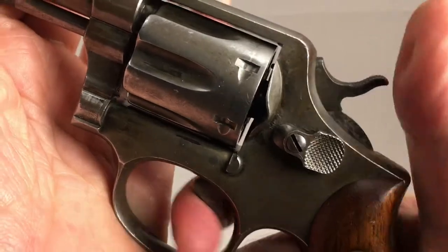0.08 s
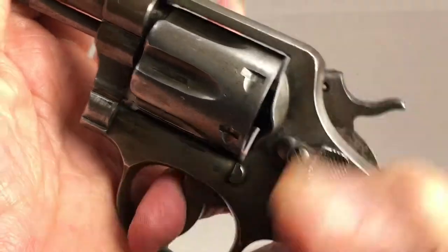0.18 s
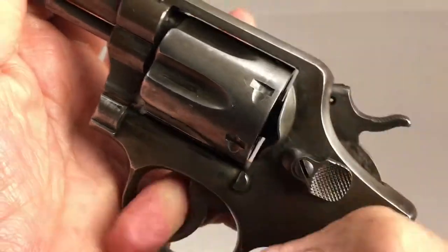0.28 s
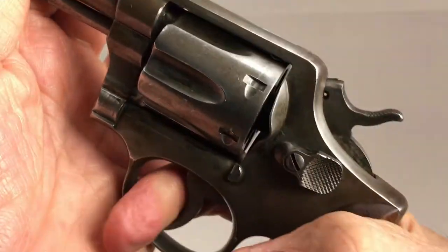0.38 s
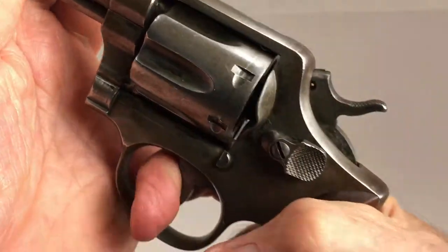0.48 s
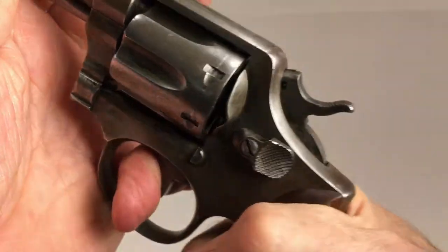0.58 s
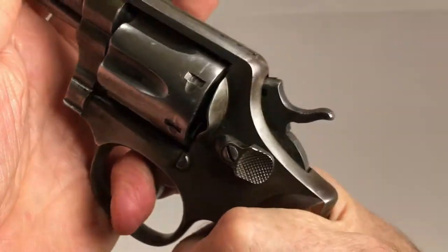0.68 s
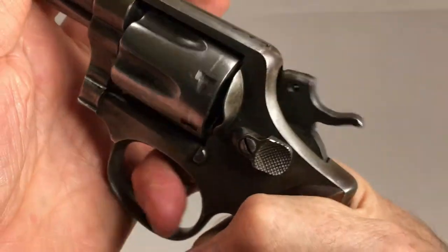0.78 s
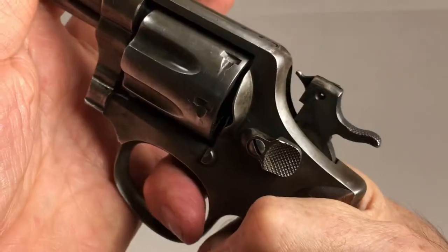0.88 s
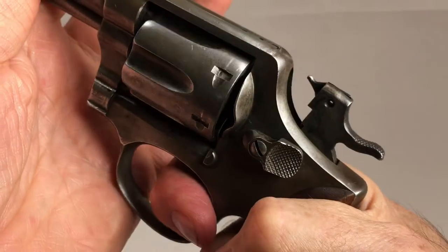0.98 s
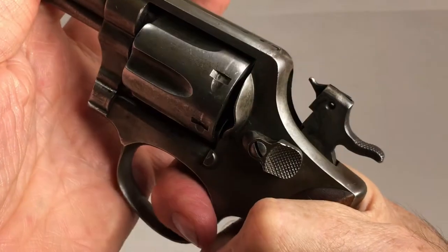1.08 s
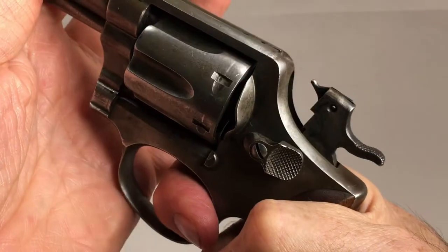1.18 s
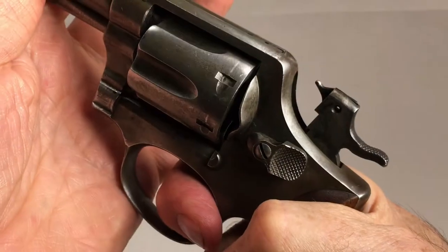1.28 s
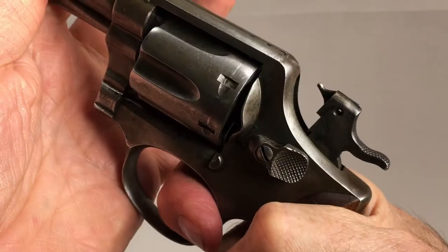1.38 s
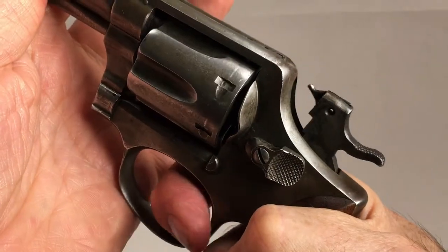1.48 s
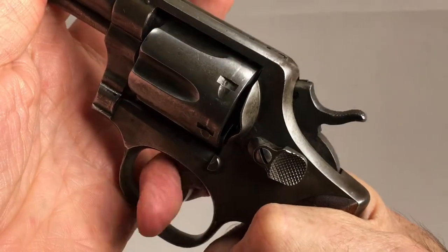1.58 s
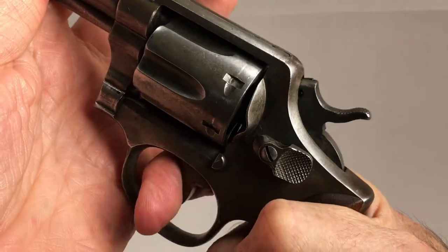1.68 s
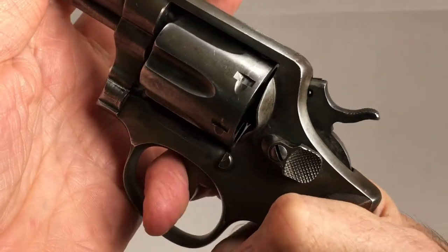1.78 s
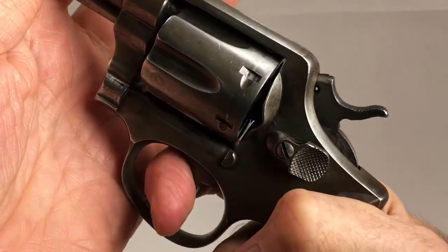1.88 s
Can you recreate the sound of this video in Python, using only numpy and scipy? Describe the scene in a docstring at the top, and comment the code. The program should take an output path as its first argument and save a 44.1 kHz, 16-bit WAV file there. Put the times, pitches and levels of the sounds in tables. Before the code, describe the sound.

Revolver action clicks sharply as the trigger springs forward, the cylinder locks and the hammer falls

```python
"""Low rumble and fine hiss fill a small quiet room, then a revolver is worked by hand close to the microphone.
The trigger springs forward, a slow pull turns and locks the cylinder with two dry knocks, and the hammer falls.
Each click is a few steel contacts within milliseconds: broadband pulses, dense clatter and dying modes.
Small ticks lead up to the clicks; noise bands are the soft rubs, falling sines the jolts of the frame.
A response of early scatter, one wall echo and a short tail gives the room."""
import sys
import numpy as np
from scipy import signal
from scipy.fft import rfft, irfft
from scipy.io import wavfile

SR = 44100
rng = np.random.default_rng(int(sys.argv[2]) if len(sys.argv) > 2 else 0)


def unload_wav(signal):
    """Save mono or channel-first audio to the path in sys.argv[1] as 16-bit WAV at rate SR, clipped to [-1, 1]."""
    wavfile.write(
        sys.argv[1],
        SR,
        np.round(np.clip(np.atleast_2d(signal).T, -1, 1) * 32767).astype(np.int16),
    )


N = 85995  # length in samples
ONE_MS_GAIN = np.sqrt(SR / 1000)  # gives a sound of energy 1 an rms of 1 over one millisecond


def amp(db):
    """Decibel definition: converts a level to an amplitude gain."""
    return 10 ** (np.asarray(db) / 20)


def unit(x):
    """Energy normalisation: scales the sum of squares to 1."""
    return x / np.sqrt(np.sum(x ** 2) + 1e-20)


def read(points, hz):
    """Logarithmic interpolation: reads a curve on a log-frequency axis."""
    point_hz, value = np.transpose(points)
    return np.interp(np.log(hz + 1), np.log(point_hz + 1), value)


def add(mix, start_s, sound):
    """Superposition: adds a sound into the mix, in place, from its start time."""
    part = mix[max(round(start_s * SR), 0):][:len(sound)]
    part += sound[:len(part)]


def seconds(size):
    """Sampling: the time axis of so many samples."""
    return np.arange(size) / SR


def noise(colour):
    """Spectral shaping: steady random noise of rms 1 with the given spectrum."""
    gain = amp(read(colour, np.fft.rfftfreq(N, 1 / SR)))
    shaped = irfft(rfft(rng.standard_normal(N)) * gain, N)
    return unit(shaped) * np.sqrt(N)


def snap(colour, tilt_db=0, size=2048):
    """Minimum phase: the causal pulse of a given spectrum with its energy as early as possible."""
    hz = abs(np.fft.fftfreq(size, 1 / SR))
    tilt = tilt_db * np.log2(1 + hz / 1000)
    log_gain = np.log(amp(read(colour, hz) + tilt))
    # the Hilbert transform of the log gain supplies the phase
    spectrum = np.exp(np.conj(signal.hilbert(log_gain)))
    return unit(np.fft.ifft(spectrum).real[:size // 2])


def clatter(pulse, snap_db, clatter_db, t60_s):
    """High modal density: a pulse, then the dense, quickly dying vibration of small steel parts."""
    t = seconds(size=16384)
    impulses = rng.choice([-1., 1.], len(t)) * amp(-60 * t / t60_s)
    dense = unit(signal.fftconvolve(impulses, pulse)[:len(t)])
    out = amp(clatter_db) * dense
    add(out, 0, amp(snap_db) * pulse)
    return out


def ring(modes):
    """Modal decay: dying sines (pitch_hz, level_db, t60_s) that start from rest, with total energy 1."""
    t = seconds(size=16384)
    total = np.zeros(len(t))
    for k, (pitch_hz, level_db, t60_s) in enumerate(modes):
        sign = (-1) ** k
        total += sign * amp(level_db - 60 * t / t60_s) * np.sin(2 * np.pi * pitch_hz * t)
    return unit(total)


# rumble spectrum: frequency_hz, density_db (dB per Hz, relative)
RUMBLE = [(15, -43), (25, -23), (52, -2), (85, -9.5), (120, -2.5), (190, -2), (245, -10), (290, -17),
          (390, -18), (470, -26.5), (1000, -30)]
# hiss spectrum: frequency_hz, density_db (dB per Hz, relative)
HISS = [(300, -2.5), (700, 3), (1500, 1.5), (4000, -1), (8000, -4.5), (12000, -8), (16000, -11.5)]
# level of the hiss, which dips twice: time_s, level_db (relative to HISS_DB)
HISS_LEVEL = [(0, 0.5), (.67, -2), (.72, -9), (.87, -8.5), (.93, -2), (1.475, -.5), (1.495, -12),
              (1.61, -10), (1.67, -1.5), (1.95, 0)]
RUMBLE_DB, HISS_DB = -52.5, -62.5  # rms levels


def background():
    """Stationary noise: a low room rumble, and a fine hiss whose level follows a curve."""
    rumble = noise([*RUMBLE, (2000, -54), (16000, -91)])
    hiss_db = HISS_DB + np.interp(seconds(size=N), *np.transpose(HISS_LEVEL))
    return amp(RUMBLE_DB) * rumble + amp(hiss_db) * noise(HISS)


# reverberation time: frequency_hz, t60_s
ROOM_T60 = [(200, 0.03), (1000, 0.38), (4000, 0.39), (8000, 0.3156), (15000, 0.21)]
# spectrum of the tail: frequency_hz, level_db (relative)
ROOM_COLOUR = [(200, -1), (1000, -3.5), (2500, -1), (5000, -3), (9000, -3), (15000, 5.5)]
EARLY_DB, EARLY_T60_S = 9, .05  # scatter energy relative to the tail
WALL_S, WALL_DB = .029, -10  # echo delay, and its energy relative to the tail


def room(x):
    """Reverberation: convolves with quick scatter from hands and table, one wall echo and a short tail."""
    t = seconds(size=22050)
    hz, at, z = signal.stft(rng.standard_normal(len(t)), SR, nperseg=256)
    # each frequency band of the tail decays at its own rate
    z = z * amp(read(ROOM_COLOUR, hz)[:, None] - 60 * at / read(ROOM_T60, hz)[:, None])
    tail = signal.istft(z, SR, nperseg=256)[1][:len(t)]
    tail = unit(tail * np.minimum(t / 0.0068, 1))
    early = rng.standard_normal(len(t)) * amp(-60 * t / EARLY_T60_S)
    early = unit(early * np.minimum(t / 0.0011, 1))
    wall = unit(rng.standard_normal(len(t)) * np.exp(-t / .002))
    response = tail + amp(EARLY_DB) * early
    add(response, WALL_S, amp(WALL_DB) * wall)
    return signal.fftconvolve(x, response)[:N]


# soft rubs of skin and sliding steel: centre_s, width_s (to 1/e), centre_hz,
# half_width_octaves (to -6 dB), level_db (rms at the crest)
RUBS = [(0.506, 0.055, 450, 1.1, -60.5), (0.614, 0.0096, 8030, .8, -63), (.655, 0.023, 6500, .25, -62),
        (.765, 0.028, 1462, .4, -68), (.86, 0.036, 2400, .5, -68), (1.069, .005, 3100, .06, -56.5)]
# the grip shifts: width to 1/e
GRIP_S, GRIP_WIDTH_S, GRIP_DB, GRIP_HZ = .522, 0.031, -36, 54.5


def handling():
    """Friction and slow motion: band noise in smooth swells for rubs, a low wobble as the grip shifts."""
    t = seconds(size=N)
    hz = np.geomspace(20, SR / 2, num=200)
    grip_swell = np.exp(-((t - GRIP_S) / GRIP_WIDTH_S) ** 2)
    out = amp(GRIP_DB) * grip_swell * np.sin(2 * np.pi * GRIP_HZ * (t - GRIP_S))
    for centre_s, width_s, centre_hz, octaves, level_db in RUBS:
        band_db = -20 * np.log10(1 + (np.log2(hz / centre_hz) / octaves) ** 2)
        swell = np.exp(-((t - centre_s) / width_s) ** 2)
        out += amp(level_db) * swell * noise(np.c_[hz, band_db])
    return out


# dull knocks of the frame against the hand: start_s, level_db (envelope at the start)
KNOCKS = [(0.2073, -28), (0.9066, -17), (1.0752, -18)]
# starting pitch, time in which it halves, decay time (s)
KNOCK_HZ, KNOCK_SAG_S, KNOCK_T60_S = 765, .0009, 0.044


def knocks():
    """Damped oscillation: the frame jolts in the hand, a short push whose pitch falls at once."""
    out, t = np.zeros(N), seconds(size=4096)
    # integral of a pitch that falls as 1 / (1 + t / sag)
    turns = KNOCK_HZ * KNOCK_SAG_S * np.log1p(t / KNOCK_SAG_S)
    for start_s, level_db in KNOCKS:
        add(out, start_s, -amp(level_db - 60 * t / KNOCK_T60_S) * np.sin(2 * np.pi * turns))
    return out


# light ticks of pawl and springs: start_s, level_db (rms if held within 1 ms),
# tilt_db (dB per octave, well above 1 kHz), pitch_hz
TICKS = [(0.1734, -31.5, 4.5, 8820), (0.1785, -34.5, -0.5, 8200), (0.1903, -35.5, -1.5, 4590),
         (0.1957, -31, 1, 11560), (0.1989, -27, 1.5, 4135), (0.7006, -33.5, 3, 3720),
         (0.7987, -54, -13, 2140), (0.8266, -53, -4.5, 4480), (0.8332, -39, -8.5, 4370),
         (0.8346, -37.5, 5, 2640), (0.8481, -46, 4, 8500), (0.8822, -62, 4, 7500), (1.009, -48, 5, 5980),
         (1.5132, -59, 2, 3300), (1.5675, -49, -2.5, 5510), (1.5870, -49, -2.5, 3870),
         (1.623, -55, 1.5, 4260), (1.6247, -47, 4, 4200), (1.6345, -42, -3, 6000), (1.6398, -37, 0, 5960),
         (1.6432, -38, -0.5, 8080)]
# spectrum of a tick before its tilt: frequency_hz, density_db (relative)
TICK = [(200, -31), (900, -25), (2000, -3.5), (4000, 1.5), (6000, 3), (9000, -5), (12000, -7), (16000, -15)]
TICK_T60_S, TICK_SNAP_DB, TICK_ROOM_DB = .012, -5, -19.5
TICK_RING_DB, TICK_RING_T60_S = -2.5, 0.0048


def light_ticks():
    """Impact of light parts: each tick is a tilted pulse with clatter and a single dying mode."""
    ticks = np.zeros(N)
    for start_s, level_db, tilt_db, pitch_hz in TICKS:
        impact = unit(clatter(snap(TICK, tilt_db), TICK_SNAP_DB, 0, TICK_T60_S))
        mode = ring([(pitch_hz, 0, TICK_RING_T60_S)])
        tick = unit(impact + amp(TICK_RING_DB) * mode)
        add(ticks, start_s, ONE_MS_GAIN * amp(level_db) * tick)
    return ticks + amp(TICK_ROOM_DB) * room(ticks)


# contacts of the action: start_s, level_db (scales the whole contact), part
CONTACTS = [(0.1436, -30, "lever"), (0.1463, -18.5, "lever"), (0.2040, -12, "trigger"),
            (0.2063, -3.5, "trigger"), (0.209, -16, "trigger"), (0.2107, -20, "trigger"),
            (0.9055, -14.5, "stop"), (0.9059, -9.5, "stop"), (0.9071, -11.5, "stop"),
            (1.0752, -8, "cylinder"), (1.6455, -11.5, "hammer"), (1.6478, -7, "hammer"),
            (1.65, -4.5, "hammer"), (1.6516, -12, "hammer")]
# colour of each part's contact: frequency_hz, density_db (dB per Hz, relative)
LEVER = [(120, -47), (300, -22.5), (900, -21), (1300, -17), (2100, -6), (2600, -10), (3400, 1), (4600, -11),
         (5800, -2), (8000, -10), (13000, -14.5), (16000, -21)]
TRIGGER = [(120, -40.5), (420, -22.5), (650, -11), (1050, -14), (1600, -15.5), (2600, -7.5), (4300, 0),
           (5700, -6.5), (6700, -5.5), (9800, -12), (13500, -8), (16000, -19)]
STOP = [(240, -24), (450, -6), (620, -12.5), (1000, 0.5), (1500, -10), (2100, -1), (2700, -14.5),
        (3900, -2.5), (5100, -9.5), (8400, 3.5), (9400, -11), (13000, -3.5), (16000, -11)]
CYLINDER = [(240, -27.5), (450, -1.5), (1200, -3), (2300, -0.5), (2900, -7.5), (4000, 4), (4800, -3.5),
            (6400, -6), (7400, -12.5), (8400, -6), (11400, -13), (13100, -23), (14800, -15), (16000, -26)]
HAMMER = [(120, -39), (250, -25), (380, -17.5), (560, -29), (800, -28), (1400, -19), (2200, -9.5),
          (2700, -8), (3900, 1), (4800, -7), (6200, 2), (9800, -2), (14000, -11), (16000, -19)]
# short resonances of each part: pitch_hz, width_hz, level_db (relative, before the width term)
LEVER_MODES = [(2070, 80, -5.5), (3340, 63, -2.5), (3870, 160, -6), (4444, 160, -9.5), (5450, 180, -7),
               (6120, 190, -4.5), (11300, 190, -17.5)]
TRIGGER_MODES = [(3340, 90, -15), (3940, 92, -0.5), (4240, 140, 1), (4420, 100, 1), (5350, 150, -5.5),
                 (6643, 110, -1.5), (7730, 110, -9), (8470, 160, -7), (10900, 110, -12.5),
                 (12700, 130, -13)]
STOP_MODES = [(2070, 240, -1.5), (4020, 310, -7), (6240, 460, -7.5), (7090, 280, -6), (7570, 400, -1),
              (8580, 680, 7), (10700, 210, -11.5), (12900, 550, -17), (14800, 490, -21)]
CYLINDER_MODES = [(3170, 150, 2), (4060, 190, -15), (4600, 150, -3), (5250, 200, 2), (6550, 160, 12),
                  (8220, 96, -3), (11300, 160, 0), (15300, 270, -1)]
HAMMER_MODES = [(3895, 160, -3), (5300, 120, -2), (5930, 230, 1), (6870, 160, 1), (8030, 220, 3.5),
                (9300, 61, -3), (10800, 160, -3.5), (11300, 110, 0.5), (13440, 100, 2.5), (14900, 96, -2)]
# make-up of each part's contact, by part: colour, modes, snap_db, clatter_db, clatter_t60_s,
# modes_db, frame_ring_db, room_db
PARTS = {"lever": (LEVER, LEVER_MODES, -9.5, -5.5, .011, -6.5, -33, -28),
         "trigger": (TRIGGER, TRIGGER_MODES, -13.5, -4, 0.012, -1, -26, -19.5),
         "stop": (STOP, STOP_MODES, -6, -5, 0.007, -5, -29, -24),
         "cylinder": (CYLINDER, CYLINDER_MODES, -2, -7.5, 0.0074, -10, -25, -25),
         "hammer": (HAMMER, HAMMER_MODES, -18, -3, .015, -5.5, -42.5, -21.5)}
# long faint ring of the steel frame: pitch_hz, level_db (relative), t60_s
FRAME = [(2790, -7, .12), (3870, -1, 0.22), (4280, -2, 0.21), (4608, -1, 0.25), (4710, -0.5, 0.21),
         (5017, -5.5, 0.092), (5190, -6, .26), (6430, -0.5, 0.12), (7550, -3, .17), (8267, -1, .17),
         (8610, -2.5, 0.24), (11900, -6, .12)]
# what the whole gun radiates into the room: frequency_hz, density_db (dB per Hz, relative)
RADIATED = [(200, -21.5), (1200, -11), (2000, -10), (2600, -3), (3300, -2.5), (4500, 4.5), (5600, 1.5),
            (8500, 2.5), (10000, -5), (13000, -6.5), (16000, -12.5)]
OWN_COLOUR_DB = -11.5  # gain of the part's own sound in what reaches the room


def steel_contacts():
    """Impact excitation: each contact sets off pulse, clatter, part modes and frame, and wakes the room."""
    out = np.zeros(N)
    frame, radiated = ring(FRAME), snap(RADIATED)
    for start_s, level_db, part in CONTACTS:
        colour, modes, snap_db, clatter_db, clatter_t60_s, modes_db, frame_db, room_db = PARTS[part]
        decaying = []
        for pitch_hz, width_hz, mode_db in modes:
            # a resonance dies faster the wider it is
            t60_s = np.log(1000) / np.pi / width_hz
            decaying.append((pitch_hz, mode_db + 10 * np.log10(width_hz), t60_s))
        impact = clatter(snap(colour), snap_db, clatter_db, clatter_t60_s)
        hit = impact + amp(modes_db) * ring(decaying)
        to_room = amp(OWN_COLOUR_DB) * hit[:2048]
        add(to_room, 0, radiated)
        direct = hit + amp(frame_db) * frame
        add(out, start_s, ONE_MS_GAIN * amp(level_db) * direct)
        add(out, start_s, ONE_MS_GAIN * amp(level_db + room_db) * room(to_room))
    return out


def scene():
    """Superposition: the background, the hands and the revolver sum to one channel."""
    return (background() + handling() + knocks() + light_ticks() + steel_contacts())[None]


LOW_CUT_HZ, EDGE_HZ = 29, 16050


def record(dry):
    """Linear filtering and clipping: the microphone's low cut, full-scale limit, then the band limit."""
    low_cut = signal.butter(2, LOW_CUT_HZ, "high", fs=SR, output="sos")
    held = np.clip(signal.sosfilt(low_cut, dry), -1, 1)
    band_limit = signal.firwin(255, EDGE_HZ, window=("kaiser", 9), fs=SR)
    return signal.oaconvolve(held, band_limit[None], "same")


dry = scene()
out = record(dry)
unload_wav(out)
```